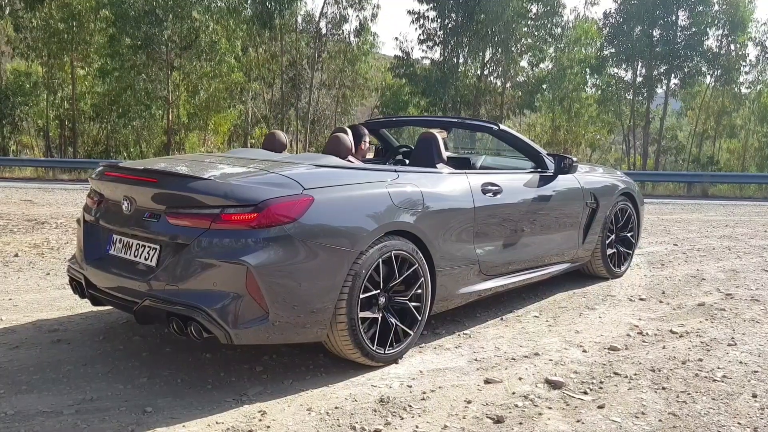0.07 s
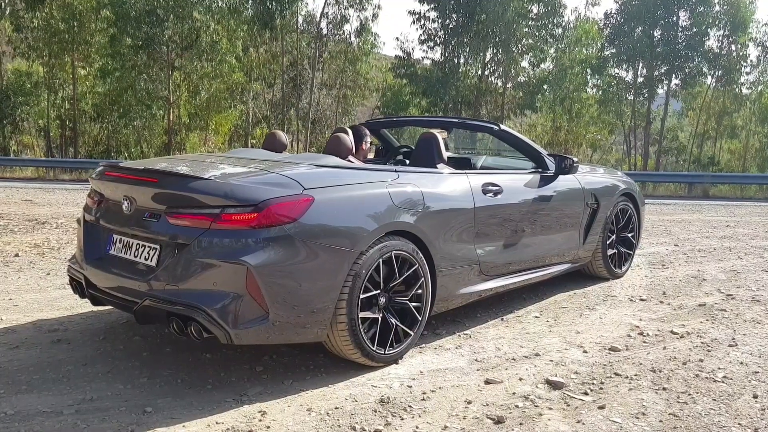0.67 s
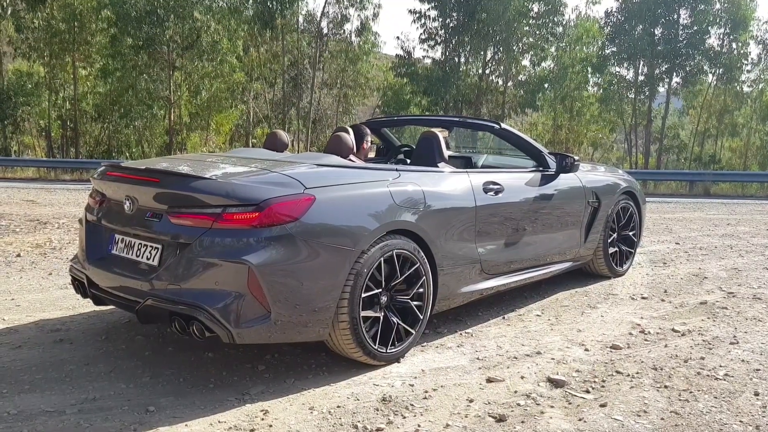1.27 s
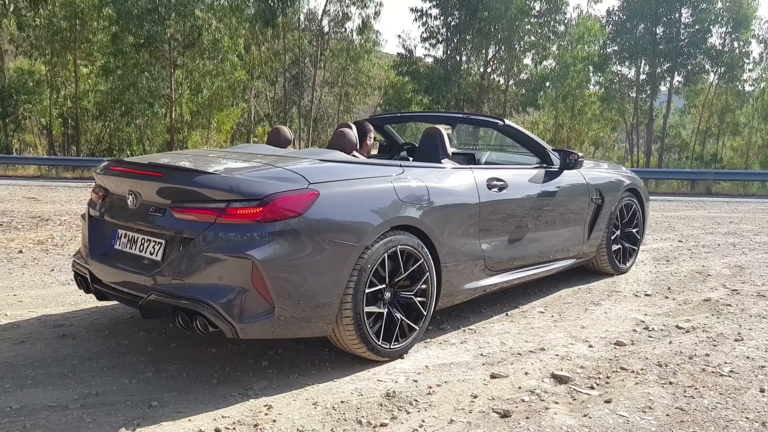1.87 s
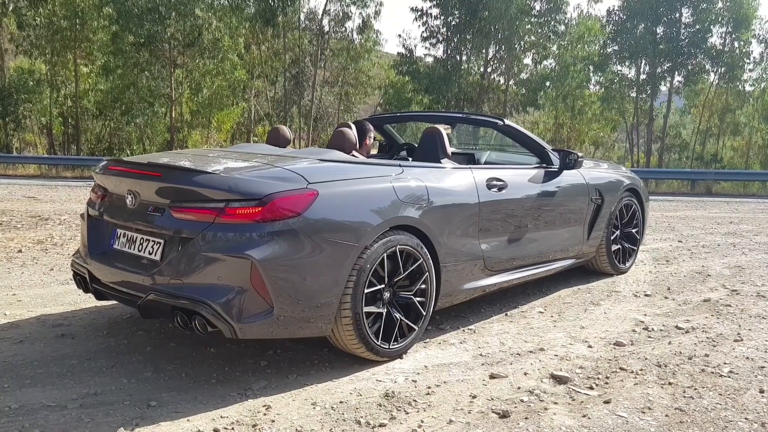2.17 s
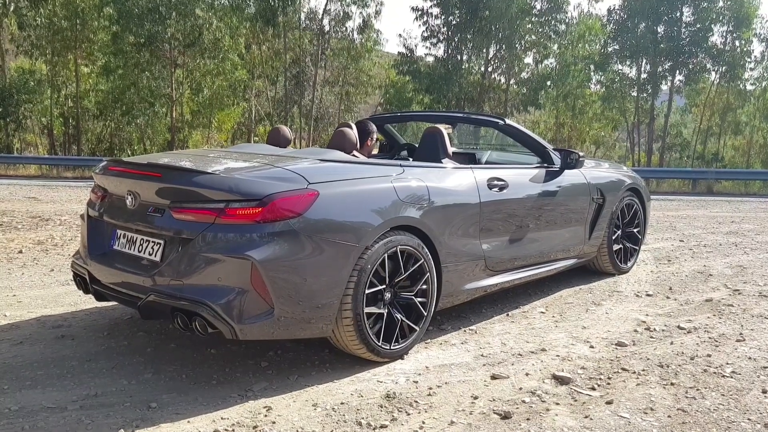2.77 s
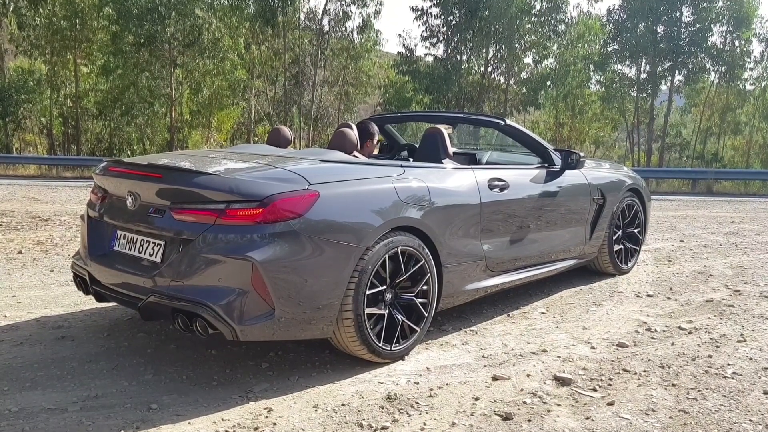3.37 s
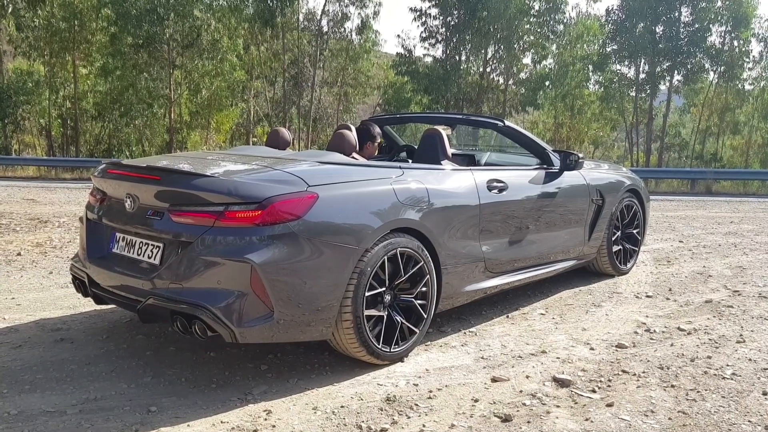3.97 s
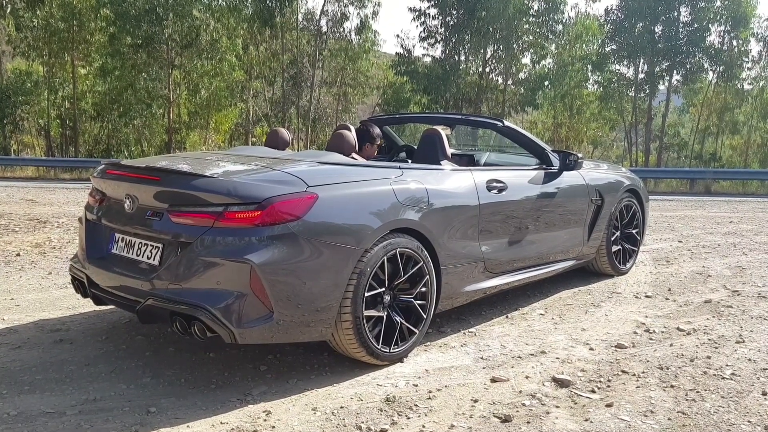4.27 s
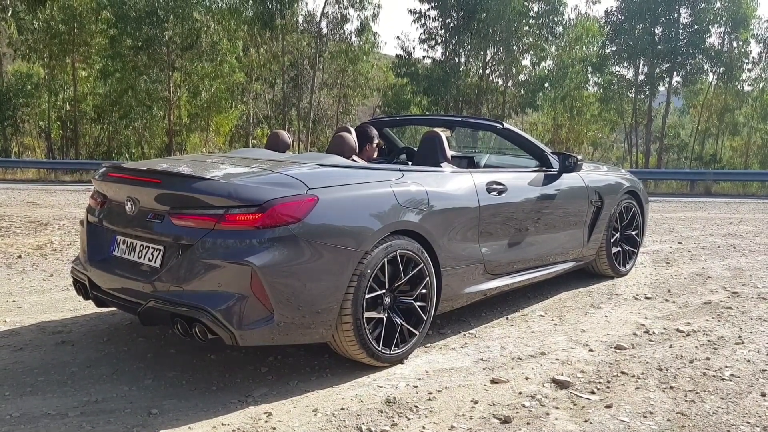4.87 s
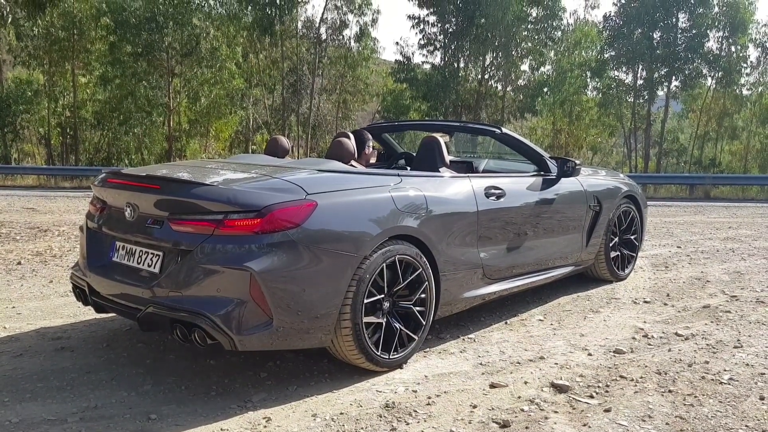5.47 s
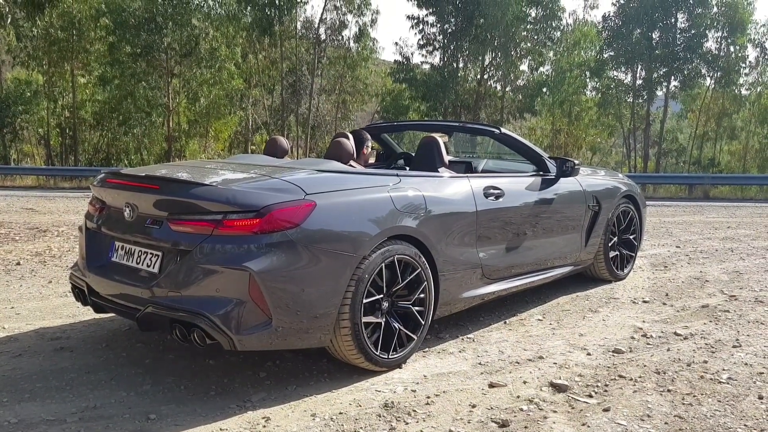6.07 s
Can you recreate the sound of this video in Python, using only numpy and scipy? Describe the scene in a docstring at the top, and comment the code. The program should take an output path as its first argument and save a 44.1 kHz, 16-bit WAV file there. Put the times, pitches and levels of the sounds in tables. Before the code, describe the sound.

A powerful car is started outdoors, heard from a few metres behind its exhaust. A metallic clack and a short starter whirr lead into a barking, crackling surge as the engine fires. The revs fall away with a few burbling pops into a low, throbbing idle with faint mechanical rustle and whine. The idle roughens slightly, then one loud, raspy rev climbs steeply to finish. Soft open-air noise lies underneath.

```python
"""Starting a V8 convertible

The car stands on gravel, heard from a few metres behind its tailpipes. The starter clacks in and whirrs;
the engine catches with a flare, burbles down to a loping idle and is revved. Each firing sends a pressure
pulse through the resonant muffler and pipes, then a hiss of turbulent gas. Valve gear, belts and a small
pump sound faintly. The trees return a weak echo, and quiet outdoor noise lies underneath."""
import sys
import numpy as np
from scipy import signal
from scipy.fft import rfft, irfft, next_fast_len
from scipy.io import wavfile
from scipy.ndimage import uniform_filter1d, map_coordinates

SR = 44100
rng = np.random.default_rng(int(sys.argv[2]) if len(sys.argv) > 2 else 0)


def bounce(signal):
    """Save signal as a 16-bit WAV file at the path given by the first command-line argument."""
    frames = np.transpose(np.atleast_2d(signal))
    limited = np.clip(frames, -1, 1)
    pcm = np.round(limited * 32767).astype(np.int16)
    wavfile.write(sys.argv[1], SR, pcm)


N = 274302

IDLE_HZ, CATCH_S = 49.6, 1.02  # firing rate at idle; the moment the engine catches
LADEN_S, LADEN_RISE_S = 3.3, 0.82  # the idle takes on load and grows harsher
STARTER_ON_S, STARTER_FREE_S, STARTER_OFF_S = 0.623, 0.88, 1.11  # freed as the engine takes over

# Spectra of the exhaust resonators, the escaping gas and the pump's body: frequency_hz, level_db
MUFFLER = [(20, -42), (42, -3), (68, 13), (90, 4.5), (130, -3), (190, -6.5), (300, -32), (600, -65.5),
           (2000, -100)]
OPEN_PIPE = [(40, -45), (90, -2), (150, 15.5), (175, 13.5), (240, 5), (340, 3), (430, -24.5), (520, -10),
             (610, -21.5), (720, -14.5), (1000, -25), (1450, -26.5), (2200, -48), (5000, -57), (9000, -100)]
GAS = [(260, -24.5), (450, 3.5), (610, -15.5), (695, 8.5), (806, 3.5), (879, -14.5), (959, 4.5), (1160, -1),
       (1420, 4), (2000, -9.5), (2250, -18.5), (2740, -6), (3080, -32), (3600, -37.5), (4680, -51),
       (7920, -120)]
HISS = [(1760, -29), (3000, 2), (4600, -1.5), (5220, 1), (6200, -6), (6620, -1), (7910, -15), (10400, -12),
        (14500, -22)]
PUMP_BODY = [(600, -24.5), (1200, -10), (2000, -2), (2400, 5), (2850, -3), (3300, -10), (4900, -15),
             (6000, -12.5), (8000, -36.5)]
# Stereo balance of the exhaust, engine bay and starter: frequency_hz, left_minus_right_db
EXHAUST_SIDE = [(60, -1), (110, -1.5), (200, -5), (370, 11), (680, 0.5), (1260, 3), (2310, 4), (4250, 0),
                (7810, 3), (14400, -13)]
BAY_SIDE = [(60, 0), (110, 0.5), (200, -1), (370, 1), (680, -1), (1260, 4), (2310, 6.5), (4250, -4.5),
            (7810, -9.5), (14400, -0.5)]
STARTER_SIDE = [(60, -9), (110, -12), (200, 0), (370, -1.5), (680, 0), (1260, 4.5), (2310, 4.5), (4250, -1),
                (7810, -5.5), (14400, -2.5)]


def exhaust(rate, opening, bank_sway=1.2, puff_s=0.0024, low_cut_hz=38):
    """Source and filter: one pulse per firing excites the muffler and pipe and gates the jet noise."""
    # Each cylinder's departure from the mean puff, in firing order: deviation_share
    cylinders = np.array([-0.13, -0.11, -0.21, 0.11, -0.056, -0.17, -0.18, -0.1])
    # The pipes favour some speeds and cancel others: firing_hz, boom_db, lope_db, bark_db
    pipe_tuning = [(49.4, -3, 5.5, -2.5), (56.04, 2, -2.5, -1), (59.7, 3.5, 4, 5.5), (69, 1.5, 4.5, 0),
                   (99.3, -3, -7, 4), (102.2, -7.5, -8.5, 2), (115.2, -23, 0.5, 0),
                   (167.3, -6.5, -11.5, 0.5), (201, -21.5, 6, -2.5)]
    # Level of each layer: idle_db, full_throttle_gain_db, speed_db_per_octave, laden_gain_db
    boom_law = (-28, 27, -4.5, 3.5)
    lope_law = (-32, 16, -3, 3)
    bark_law = (-54.5, 25, 4.5, 6)
    rasp_law = (-66, 27.5, 4.5, 6)
    hiss_law = (-79, 15.5, 6, 4.5)
    speeds, boom_gain_db, lope_gain_db, bark_gain_db = np.transpose(pipe_tuning)
    # the boom answers the first touch of throttle most strongly
    boom_db = loudness(boom_law, opening ** 0.84, rate) + np.interp(rate, speeds, boom_gain_db)
    lope_db = loudness(lope_law, opening, rate) + np.interp(rate, speeds, lope_gain_db)
    lope_db -= 10 * idling(opening)
    bark_db = loudness(bark_law, opening, rate) + np.interp(rate, speeds, bark_gain_db)
    rasp_db = loudness(rasp_law, opening ** 1.14, rate)
    hiss_db = loudness(hiss_law, opening ** 1.14, rate)

    firings = np.cumsum(rate) / SR
    count = np.floor(firings - 3 / 8).astype(int)
    at = np.flatnonzero(np.diff(count)) + 1  # the sample of each firing
    pulses = lambda sizes: np.bincount(at, sizes, N)
    cylinder = count[at] % len(cylinders)
    uneven = cylinders[cylinder]
    lope_jitter, bark_jitter, jet_jitter = rng.standard_normal((len(at), 3)).T
    # at speed and under load one bank's pipe dominates, which brings out the half orders
    bank = bank_sway * (1 - 2 * (cylinder % 2)) * np.clip((rate[at] - 50) / 40, 0.2, 1)
    bank *= np.clip((bark_db[at] + 57) / 22, 0.25, 1)
    racing = np.clip((rate[at] - 130) / 50, 0, 1)

    boom = amp(boom_db) * np.sqrt(2) * np.cos(2 * np.pi * (firings + 1 / 9))
    # a low cut keeps the boom free of rumble below the idle note
    boom = filtered(boom, lambda hz: hz ** 8 / (hz ** 8 + low_cut_hz ** 8))
    lope_sizes = 0.17 + uneven + racing * bank + 0.18 * lope_jitter
    lope = amp(lope_db) * steady(through(pulses(lope_sizes), ringing(MUFFLER)))
    roughness = (0.08 + 0.06 * opening[at]) * bark_jitter
    bark_sizes = 0.11 + 0.67 * opening[at] + bank + 0.9 * uneven + roughness
    bark = amp(bark_db) * steady(through(pulses(bark_sizes), ringing(OPEN_PIPE)))

    # each puff tears into turbulence that dies within milliseconds
    jet_sizes = amp(1.4 * jet_jitter + 2 * bank + 2 * uneven)
    jets = through(pulses(jet_sizes), np.exp(-np.arange(SR // 20) / SR / puff_s))
    stream = 0.21 + np.clip((-45 - rasp_db) / 12, 0, 1)  # smoother flow with the throttle shut
    gate = steady(jets + stream)
    rasp = amp(rasp_db) * rush(GAS, EXHAUST_SIDE, 0.15, gate)
    hiss = amp(hiss_db) * rush(HISS, EXHAUST_SIDE, 0.12, gate + 1)
    return ramp(CATCH_S, 0.02) * (boom + lope + bark + rasp + hiss)


def firing_rate(settle_s=1.5):
    """The exhaust's fundamental in Hz: it flares, relaxes exponentially towards idle, then is revved."""
    # Engine speed in the opening flare and in the rev: time_s, firing_hz
    flare = [(1.02, 45.5), (1.07, 52.4), (1.13, 84.5), (1.2, 106), (1.3, 120), (1.38, 115.5), (1.45, 98),
             (1.6, 93), (1.75, 80), (1.9, 71.5), (2.05, 66.6)]
    rev = [(5.78, 51), (5.9, 73), (5.98, 96), (6.07, 138), (6.17, 195), (6.22, 203)]
    settling = IDLE_HZ + (curve(flare) - IDLE_HZ) * np.exp(-since(flare[-1][0]) / settle_s)
    return np.where(since(rev[0][0]) > 0, curve(rev), settling)


def throttle():
    """Overlapping throttle movements add up to the opening that sets the strength of the exhaust."""
    # Catch, overrun, tip-in, rev, further press: open_s, shut_s, opening_share, rise_s, fall_s
    presses = [(0.995, 1.288, 0.9, 0.1, 0.093), (1.494, 1.76, 0.17, 0.047, 0.13),
               (5.766, 6.3, 0.28, 0.038, 0.1), (5.885, 6.3, 0.5, 0.05, 0.1), (6.032, 6.3, 0.13, 0.16, 0.1)]
    return sum(share * swell(opens, shuts, rise, fall) for opens, shuts, share, rise, fall in presses)


def loudness(law, opening, rate):
    """A layer's level in dB: the gains from throttle, speed and idle load add on a logarithmic scale."""
    idle_db, throttle_db, octave_db, laden_db = law
    load_db = laden_db * ramp(LADEN_S, LADEN_RISE_S)
    return idle_db + throttle_db * opening + octave_db * np.log2(rate / IDLE_HZ) + load_db


def idling(opening):
    """The steady state: 1 at a settled idle, 0 in the flare and under throttle."""
    return ramp(start_s=2, rise_s=0.16) * np.clip(1 - 3 * opening, 0, 1)


def idle_beat(rate, opening, waver_db=1.2, stray_rad=0.27):
    """Periodicity: one strong cylinder heaves the exhaust once a cycle, adding a comb of harmonics."""
    # Harmonics of the eight-firing engine cycle: order, unladen_db, laden_db
    orders = [(9, -50.5, -42.5), (10, -42, -38.5), (11, -40.5, -42.5), (12, -46.5, -49), (13, -51, -45),
              (14, -53, -44.5), (15, -51.5, -55), (16, -54.5, -41), (19, -46, -53), (20, -57, -45),
              (22, -56.5, -55), (24, -57.5, -52.5)]
    cycles = (np.cumsum(rate) / SR + 1 / 9 - 4) / 8
    laden = ramp(LADEN_S, LADEN_RISE_S)
    beat = 0
    for order, unladen_db, laden_db in orders:
        level_db = unladen_db + (laden_db - unladen_db) * laden + waver_db * wobble(7.6)
        lag_rad = 0.9 + 0.09 * (order - 11) ** 2  # dispersion in the muffler spreads out the heave
        beat += amp(level_db) * np.cos(2 * np.pi * order * cycles - lag_rad + stray_rad * wobble(4.3))
    return np.sqrt(2) * idling(opening) * beat


def drones(rate, opening):
    """Resonance: single exhaust orders sing out as the speed carries them through the pipe modes."""
    def resonate(orders, centre_hz, width):
        return sum(near(k * rate, centre_hz, width) * tone(k * rate) for k in orders)

    low = amp(-45) * (1 - ramp(2.8, 0.36)) * resonate([2.5], centre_hz=142, width=0.2)
    high = amp(-68 + 30 * np.sqrt(opening)) * resonate([2.5, 3], centre_hz=361, width=0.026)
    growl = amp(-26) * opening * resonate([1.5], centre_hz=168, width=0.13)
    throat = amp(-28) * opening ** 2 * resonate([2, 2.5], centre_hz=235.5, width=0.094)
    return ramp(CATCH_S, 0.02) * (low + high + growl + throat)


def roar(rate, opening, db_per_octave=11, top_firing_hz=203, flutter_db=2):
    """Swept excitation: whole and half orders cross the pipe resonances, louder as the revs climb."""
    # Pipe resonances: centre_hz, width_share, gain_db
    resonances = [(346, 0.098, -27), (503, 0.055, -36), (677, 0.058, -35), (940, 0.092, -41.5)]
    pipe = lambda hz: sum(amp(db) * near(hz, centre, width) for centre, width, db in resonances)
    orders = np.arange(4, 11) / 2
    partials = sum(pipe(k * rate) * amp(flutter_db * wobble(45)) * tone(k * rate) for k in orders)
    return opening ** 2 * amp(db_per_octave * np.log2(rate / top_firing_hz)) * partials


def pops(crack_t60_s=0.044, crack_rise_s=0.0018):
    """Impulse response: lone hard firings thump the muffler, bark in the pipes and crack at the tips."""
    # Hard firings and overrun burbles: start_s, thump_db, bark_db, crack_db
    firings = [(0.815, -23.5, -37, -64), (0.89, -20, -44, -66), (0.917, -6.5, -20, -23),
               (1.027, -8.5, -21.5, -19.5), (1.049, -15.5, -14.5, -18), (1.065, -24, -16.5, -16.5),
               (1.082, -15, -12.5, -16), (1.097, -28.5, -23, -15.5), (1.179, -27, -18.5, -21),
               (1.203, -37, -27.5, -27), (1.231, -34, -29, -25), (1.256, -21.5, -26.5, -27),
               (1.283, -18.5, -14, -22), (1.324, -22, -37, -33), (1.406, -18, -33.5, -45.5),
               (1.623, -17.5, -21, -38), (1.644, -20, -23, -41), (1.663, -29, -25.5, -48.5),
               (1.707, -17, -32, -48), (1.784, -22, -38, -59.5), (1.837, -22.5, -38, -59.5),
               (5.678, -19.5, -35, -50), (5.934, -30, -23, -26.5), (5.956, -25, -27, -19.5)]
    # Modes of the tailpipe tips: pitch_hz, level_db, t60_s
    tip_modes = [(997, -11.5, 0.037), (1410, -3.5, 0.016), (2450, -14, 0.024)]
    thumps, barks, cracks = np.zeros((3, N))
    for start_s, *levels_db in firings:
        at = round(start_s * SR)
        thumps[at], barks[at], cracks[at] = amp(levels_db)
    muffler, pipe = ringing(MUFFLER), ringing(OPEN_PIPE)
    thump = through(thumps, muffler / np.abs(muffler).max())
    bark = through(barks, pipe / np.abs(pipe).max())
    t = np.arange(SR // 8) / SR
    attack = 1 - np.exp(-t / crack_rise_s)
    gas = amp(-8) * rush(GAS, EXHAUST_SIDE, 0.061) + amp(-21) * rush(HISS, EXHAUST_SIDE, 0.18)
    crack = through(cracks, attack * amp(-60 * t / crack_t60_s)) * gas
    ping = amp(-2) * through(cracks, attack * modes(tip_modes, t))
    return thump + bark + crack + ping


def starter_pinion(t60_s=0.074, rise_s=0.00067):
    """Impact: the pinion slides out and strikes home in bursts of noise that ring the housing."""
    # Strikes of the pinion: start_s, clack_db, ring_db
    strikes = [(0.649, -32.5, -42), (0.669, -21.5, -28), (0.675, -33, -36), (0.682, -31, -18.5)]
    # Spectrum of the contact noise: frequency_hz, level_db
    contact = [(120, -44), (200, -22.5), (536, -9.5), (934, -10), (1100, -23.5), (1310, -5), (1460, -13),
               (1850, -11), (2640, -39.5), (3710, -19), (4600, -27.5), (6830, -34), (8620, -39),
               (14500, -34)]
    # Modes of the starter housing: pitch_hz, level_db, t60_s
    housing = [(350, -15, .1), (520, 0, .05), (740, -11, .03), (1320, -14, .04), (1930, -13, .15)]
    bursts, knocks = np.zeros((2, N))
    t = np.arange(SR // 4) / SR
    attack = 1 - np.exp(-t / rise_s)
    for start_s, clack_db, ring_db in strikes:
        at = round(start_s * SR)
        knocks[at] = amp(ring_db)
        bursts[at:at + len(t)] += amp(clack_db - 60 * t / t60_s) * attack
    slide = amp(-44) * swell(0.618, strikes[0][0], 0.09, 0.024) ** 2
    return (bursts + slide) * rush(contact, STARTER_SIDE, -0.13) + through(knocks, modes(housing, t))


def starter_motor(mesh_hz=185, mesh_depth=0.11, free_share=0.37, labour_db=4):
    """Amplitude modulation: meshing teeth pulse the gear and brush noise, which eases once freed."""
    # The motor spins up, then labours against compression: time_s, speed_share
    run_up_speeds = [(.64, .6), (.7, .73), (.73, .81), (.755, .855), (.78, .955), (.81, 1), (.84, .985),
                     (.87, .955), (.95, .97)]
    # Spectra of the gears and brushes: frequency_hz, level_db
    gear_spectrum = [(82, -55), (140, -12), (183, 5), (295, -22.5), (357, 7.5), (486, -46.5), (559, -17),
                     (704, -7.5), (811, -16.5), (1160, -10.5), (1560, -15), (2380, -9.5), (3000, -24),
                     (3900, -84), (6600, -120)]
    brush_spectrum = [(1530, -21), (2600, -11.5), (3130, 9), (5410, -1), (5900, 2.5), (6960, -0.5),
                      (7810, -12), (9620, -8.5), (11900, -6), (13600, -9), (14500, -21)]
    # Gear and commutator tones at full speed: pitch_hz, width_hz, level_db
    partials = [(230, 9.4, -17), (365, 6.8, -7), (580, 6.26, -4.5), (734, 11.8, -3.5), (1175, 20, -7),
                (2460, 22, -10), (3670, 90, -22), (4800, 290, -15), (6260, 220, -10), (7300, 220, -9.5),
                (8500, 300, -8)]
    speed = curve(run_up_speeds)
    teeth = 1 + mesh_depth * tone(mesh_hz * speed * (1 + 0.054 * wobble(20)))
    powered = swell(STARTER_ON_S, STARTER_OFF_S, 0.039, 0.021)
    strain = free_share + (1 - free_share) * np.exp(-since(STARTER_FREE_S) / 0.0064)
    labour = amp(labour_db * swell(0.832, STARTER_FREE_S, 0.0067, 0.03))
    run_up = ramp(STARTER_ON_S, 0.15)
    whirr = amp(-36) * rush(gear_spectrum, STARTER_SIDE, -0.14, teeth)
    brushes = amp(-50 + 5 * run_up) * rush(brush_spectrum, STARTER_SIDE, -0.15, teeth)
    treble_rolloff = lambda hz: 1 / (1 + (hz / 7400) ** 30)  # the whine fades out above about 7.4 kHz
    whine = sum(amp(db) * treble_rolloff(hz * speed) * narrow(hz * speed, width)
                for hz, width, db in partials)
    whine *= amp(-43) * run_up * np.exp(-since(STARTER_FREE_S) / 0.017)
    return powered * (strain * labour * (whirr + brushes) + whine)


def starter_rotor(top_hz=14300, sag=0.32, spin_up_s=0.11, coast_s=0.65):
    """Inertia: the freed rotor whistles up to speed and coasts down, with a partial an octave below."""
    spin_up = 1 - sag * np.exp(-since(STARTER_FREE_S) / spin_up_s)
    hz = top_hz * spin_up * np.exp(-since(STARTER_OFF_S) / coast_s)
    whistle = amp(-68.5) * swell(STARTER_FREE_S, 1.04, 0.041, 0.13) * narrow(hz, width_hz=420)
    lower = amp(-73.5) * swell(STARTER_FREE_S, STARTER_OFF_S, 0.034, 0.47) * narrow(hz / 2, width_hz=140)
    return whistle + lower


def engine_bay(rate, opening, tick_depth=0.05, belt_slip=0.0044):
    """Rotating machinery: valve gear rustles in time with the crank, belts whine, metal covers ring."""
    # Level of the bay: idle_db, full_throttle_gain_db, speed_db_per_octave, laden_gain_db
    bay_law = (-61, 8.5, 3, 6)
    # Spectrum of the valve gear: frequency_hz, level_db
    valve_gear = [(210, -21), (350, 0), (462, -7), (523, 1.5), (723, -3), (925, -11), (1320, -5),
                  (1660, -9), (1910, -6.5), (3490, -25), (4070, -24.5), (7210, -33), (9230, -31.5),
                  (10600, -50.5), (14000, -43)]
    # Belt and pulley whines: firing_multiple, level_db, start_s, stop_s
    pulleys = [(7.78, -65, 1.75, 1.98), (9.2, -62.5, 1.7, 2.88), (11.45, -64, 2.85, 3.3)]
    # Resonances of the engine covers: pitch_hz, width_hz, level_db
    cover_modes = [(1354, 50, -13), (1874, 30, -13.5), (2025, 26, -22), (2416, 30, -20), (3124, 43, -27),
                   (4000, 70, -30.5)]
    gain = amp(loudness(bay_law, opening, rate))
    ticking = 1 + tick_depth * tone(rate) + 0.21 * wobble(90)
    valves = gain * rush(valve_gear, BAY_SIDE, -0.15, ticking)
    slowing_db = 9 * np.log2(rate / 60)  # the whines weaken as the engine slows
    belts = 0
    for multiple, level_db, start_s, stop_s in pulleys:
        envelope = amp(level_db + slowing_db + wobble(3.3)) * swell(start_s, stop_s, 0.08, 0.2)
        belts += envelope * tone(multiple * rate * (1 + belt_slip * wobble(40)))
    covers = gain * sum(amp(db) * narrow(hz, width) for hz, width, db in cover_modes)
    return ramp(CATCH_S, 0.2) * (valves + belts + covers)


def pump(on_s=2.44, off_s=3.27, sag=0.35, spin_up_s=0.11):
    """Pitch follows shaft speed: a small electric pump chirps as it spins up, whines and stops."""
    # Partials of the whine at full speed: pitch_hz, level_db
    partials = [(1389, -8.5), (2333, -7.5), (2800, -11), (2965, -16.5), (4895, -20.5), (5918, -21)]
    inrush = np.exp(-since(on_s) / spin_up_s)
    speed = (1 - sag * inrush) * (1 + 0.004 * wobble(8))
    whine = sum(amp(db) * narrow(hz * speed, 0.0055 * hz) for hz, db in partials)
    chirp = swell(on_s, on_s + 0.18, 0.02, 0.034) * narrow(partials[0][0] * speed, width_hz=25)
    body = amp(3 + 5 * inrush) * rush(PUMP_BODY, BAY_SIDE, -0.1)
    return amp(-67) * swell(on_s, off_s, 0.023, 0.019) * (body + whine + chirp)


def pump_valve(decay_s=0.015):
    """Damped transients: the pump's valve clicks twice, coloured by the pump's body."""
    # Clicks as the pump starts: start_s, level_db
    clicks = [(2.455, -53.5), (2.503, -57)]
    envelope = sum(amp(db) * swell(s, s, 0.002, decay_s) for s, db in clicks)
    return envelope * rush(PUMP_BODY, BAY_SIDE, -0.12)


def hum(start_s=3.36, stop_s=3.66, pitch_hz=436, level_db=-64):
    """A faint, brief tone during the idle, wavering with slight frequency modulation."""
    return amp(level_db) * swell(start_s, stop_s, 0.037, 0.037) * tone(pitch_hz * (1 + 0.0054 * wobble(10)))


def trees(x, delay_samples=700, low_cut_hz=250):
    """Scattering: the edge of the wood returns a delayed, diffuse echo with little bass."""
    # Decay of the echo: frequency_hz, t60_s
    decay_times = [(100, 1), (1000, 0.13), (8000, 0.15)]
    bands_hz, t, noise = signal.stft(rng.standard_normal((2, SR // 2)), SR, nperseg=256)
    decay = amp(-60 * t / along(decay_times, bands_hz)[:, None])
    tail = signal.istft(noise * decay, SR, nperseg=256)[1]
    delayed = np.pad(x, ((0, 0), (delay_samples, 0)))
    echo = signal.fftconvolve(delayed, tail / np.linalg.norm(tail[0]), axes=1)[:, :N]
    return filtered(echo, lambda hz: hz ** 2 / (hz ** 2 + low_cut_hz ** 2))


def outdoors(first_db=-51, rise_db_per_s=9, late_db=-59, fall_s=0.94):
    """Ambient noise: a faint outdoor background, turned up at first and down once the engine runs."""
    # Spectrum of the open air: frequency_hz, level_db
    spectrum = [(18, -50.5), (30, -18), (187, -12.5), (234, -6), (350, -21.5), (428, -22.5), (497, -22),
                (550, -17), (1260, -24.5), (1580, -35.5), (1830, -24), (2290, -41), (6410, -54),
                (8240, -73.5), (12000, -55), (15600, -79), (22000, -120)]
    early_db = first_db + rise_db_per_s * np.minimum(since(0), STARTER_FREE_S)
    level_db = early_db + (late_db - early_db) * ramp(STARTER_FREE_S, fall_s)
    return amp(level_db + wobble(1)) * rush(spectrum, BAY_SIDE, -0.13)


def rush(spectrum, side, lead_ms, gate=1):
    """Partly coherent stereo noise, gated and of rms 1, that reaches the left channel lead_ms earlier."""
    # Likeness of the two channels: frequency_hz, correlation
    coherence = [(100, 0.92), (300, 1), (700, 1), (1400, 1), (2500, 0.53), (5000, 0.11), (14000, 0.69)]

    def mid_and_side(hz):
        angle = np.arccos(np.clip(along(coherence, hz), -1, 1)) / 2
        return amp(along(spectrum, hz)) * np.array([np.cos(angle), np.sin(angle)])

    mid, difference = filtered(rng.standard_normal((2, N)) * gate, mid_and_side)
    half = np.array([[0.5], [-0.5]])
    direction = lambda hz: amp(half * along(side, hz)) * np.exp(2j * np.pi * half * hz * lead_ms / 1000)
    return unit(filtered(np.array([mid + difference, mid - difference]), direction))


def ringing(spectrum, size=16384):
    """The minimum-phase impulse response of a spectrum, made causal by folding its cepstrum."""
    cepstrum = irfft(np.log(amp(along(spectrum, np.fft.rfftfreq(size, 1 / SR)))))
    cepstrum[1:size // 2] *= 2
    cepstrum[size // 2 + 1:] = 0
    return irfft(np.exp(rfft(cepstrum)))


def modes(table, t):
    """Free vibration of a struck part: a sum of damped sines."""
    return sum(amp(db - 60 * t / t60_s) * np.sin(2 * np.pi * hz * t) for hz, db, t60_s in table)


def narrow(hz, width_hz):
    """A resonance driven by noise: a fuzzy spectral line of rms 1."""
    phase = 2 * np.pi * np.cumsum(np.broadcast_to(hz, N)) / SR
    return unit(wobble(2 * width_hz) * np.cos(phase) + wobble(2 * width_hz) * np.sin(phase))


def near(hz, centre_hz, width):
    """Gain of a resonance for a gliding tone; width is a share of the centre frequency."""
    return 1 / (1 + (np.log(hz / centre_hz) / width) ** 4)


def tone(hz):
    """A sine of rms 1 whose phase is the integral of a frequency curve."""
    return np.sqrt(2) * np.sin(2 * np.pi * np.cumsum(hz) / SR)


def filtered(x, response):
    """Linear filtering: the spectrum of x times a frequency response."""
    size = next_fast_len(N + SR // 2, True)
    return irfft(rfft(x, size) * response(np.fft.rfftfreq(size, 1 / SR)), size)[..., :N]


def through(x, response):
    """Convolution of x with an impulse response."""
    return signal.fftconvolve(x, response)[:N]


def steady(x, size=4000):
    """Hold the short-term power of x at 1, whatever the engine speed."""
    power = np.abs(uniform_filter1d(uniform_filter1d(x * x, size), size))
    return x / np.sqrt(power + 1e-6 * power.mean())


def unit(x):
    """Scale to rms 1."""
    return x / np.sqrt(np.mean(x ** 2) + 1e-20)


def amp(db):
    """Decibels to amplitude gain."""
    return 10 ** (np.asarray(db) / 20)


def along(points, hz):
    """Interpolate (frequency_hz, value) points on a logarithmic frequency axis."""
    frequencies, values = np.transpose(points)
    return np.interp(np.log(hz + 1), np.log(frequencies + 1), values)


def curve(points):
    """Interpolate (time_s, value) points at every sample."""
    return np.interp(np.arange(N) / SR, *np.transpose(points))


def wobble(rate):
    """A smooth random curve with rate knots a second."""
    return map_coordinates(rng.standard_normal(int(N * rate / SR) + 4), [np.arange(N) * rate / SR])


def since(start_s):
    """Seconds since a moment, zero before it."""
    return np.maximum(np.arange(N) / SR - start_s, 0)


def ramp(start_s, rise_s):
    """A linear rise from 0 to 1."""
    return np.minimum(since(start_s) / rise_s, 1)


def swell(start_s, stop_s, rise_s, fall_s):
    """An envelope: linear rise, hold at 1, exponential decay."""
    return ramp(start_s, rise_s) * np.exp(-since(stop_s) / fall_s)


def scene():
    """Superposition of the car, its echo and the open air."""
    rate, opening = firing_rate(), throttle()
    car = exhaust(rate, opening) + idle_beat(rate, opening)
    car += drones(rate, opening) + roar(rate, opening) + pops()
    car += starter_pinion() + starter_motor() + starter_rotor()
    car += engine_bay(rate, opening) + pump() + pump_valve() + hum()
    return car + amp(-13) * trees(car) + outdoors()


def record(dry, top_hz=14700):
    """Soft saturation rounds off peaks near full scale, and a steep low-pass limits the band."""
    rounded = dry / (1 + dry ** 8) ** (1 / 8)
    return filtered(rounded, lambda hz: 1 / (1 + (hz / top_hz) ** 160))


dry = scene()
out = record(dry)
bounce(out)
```